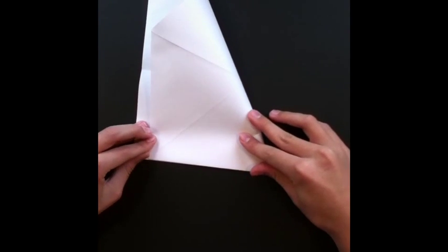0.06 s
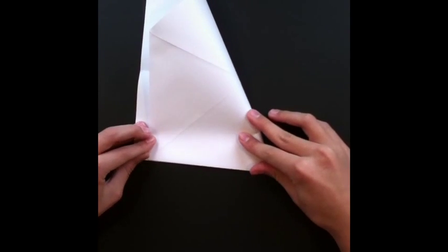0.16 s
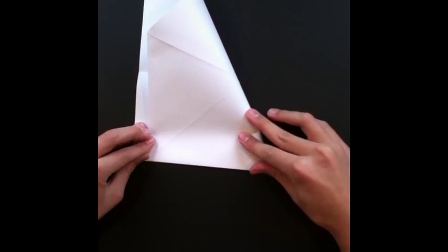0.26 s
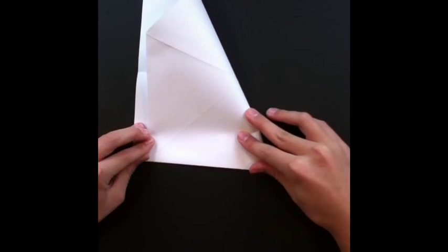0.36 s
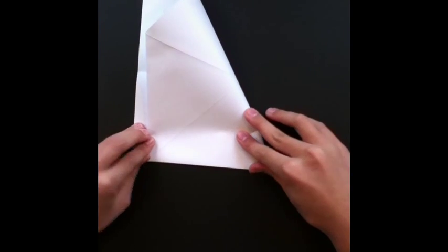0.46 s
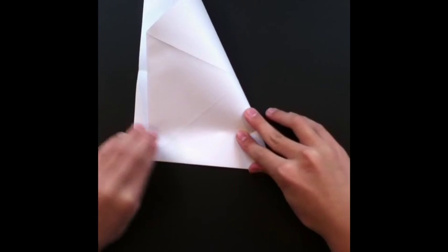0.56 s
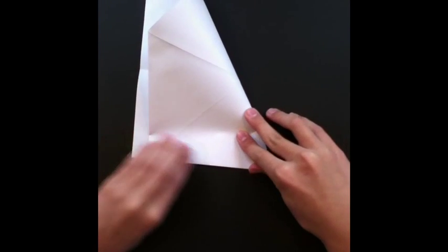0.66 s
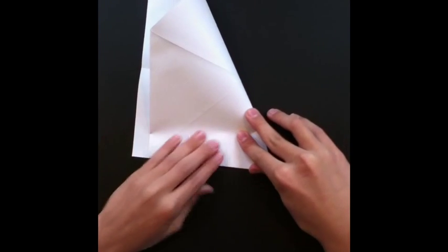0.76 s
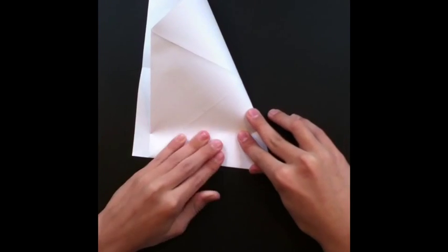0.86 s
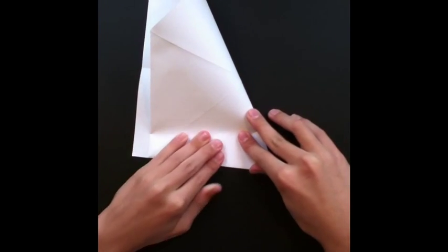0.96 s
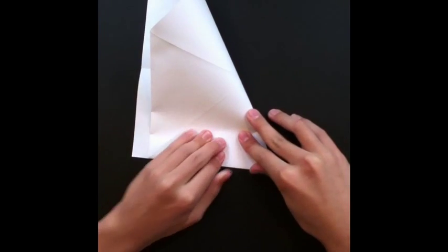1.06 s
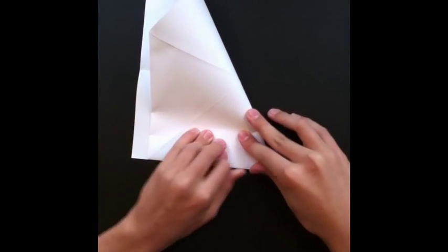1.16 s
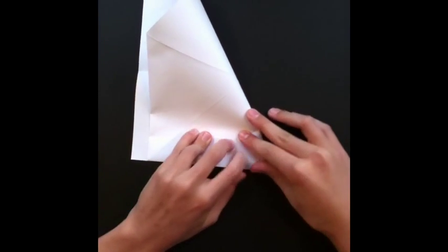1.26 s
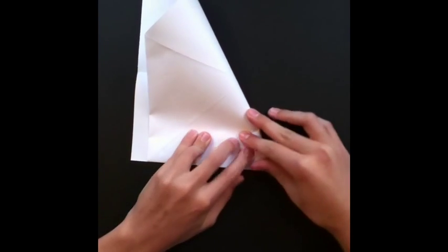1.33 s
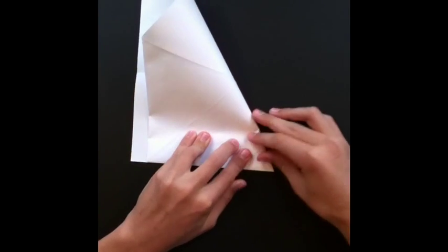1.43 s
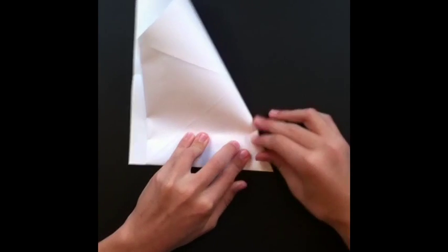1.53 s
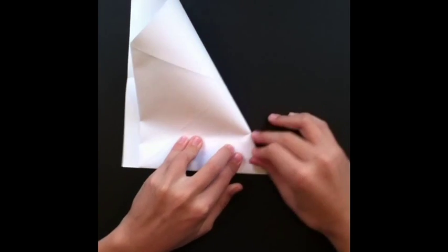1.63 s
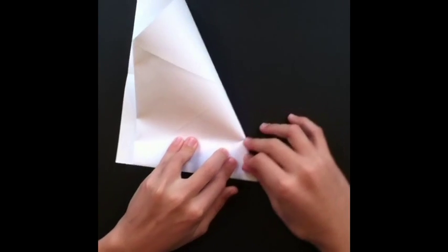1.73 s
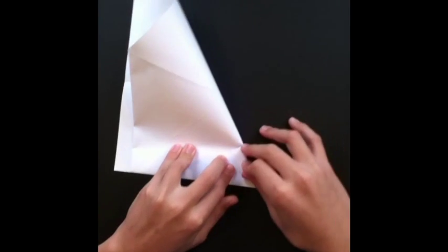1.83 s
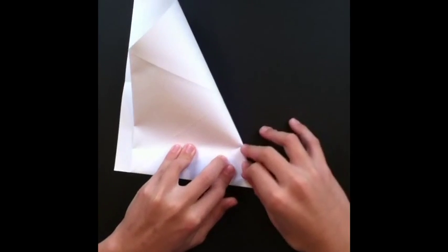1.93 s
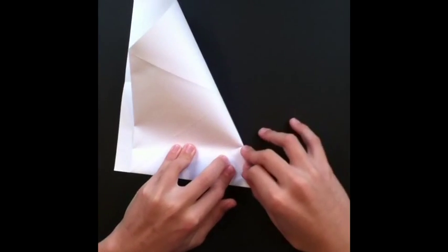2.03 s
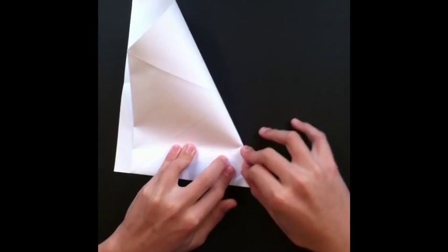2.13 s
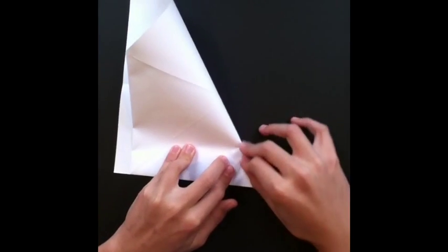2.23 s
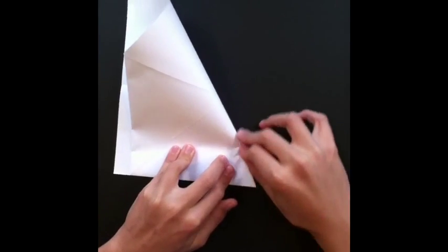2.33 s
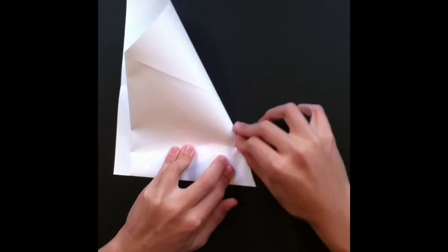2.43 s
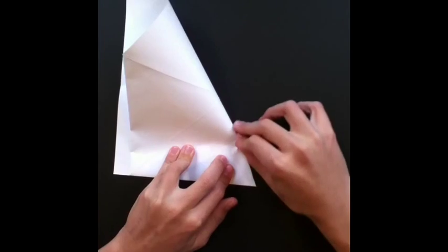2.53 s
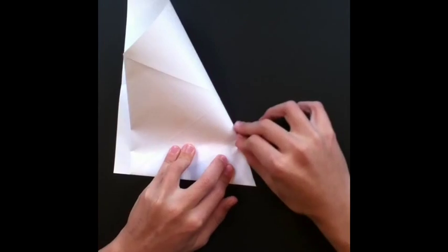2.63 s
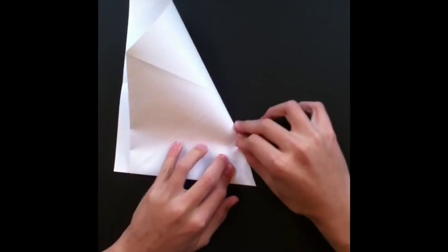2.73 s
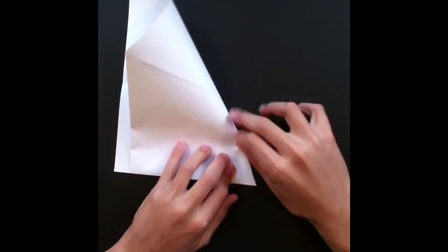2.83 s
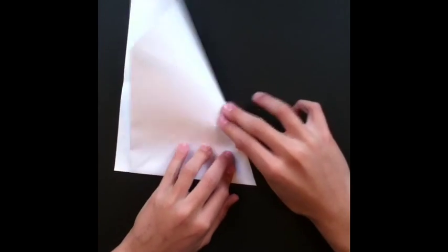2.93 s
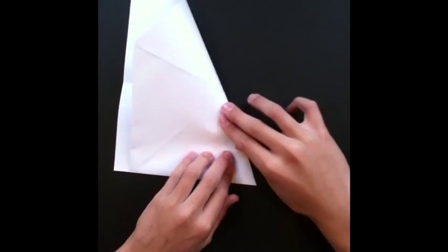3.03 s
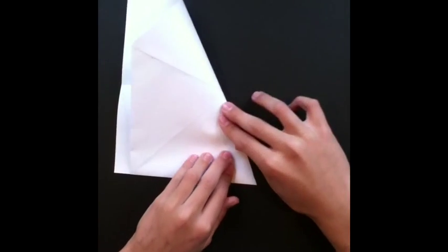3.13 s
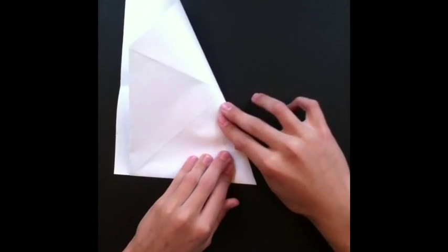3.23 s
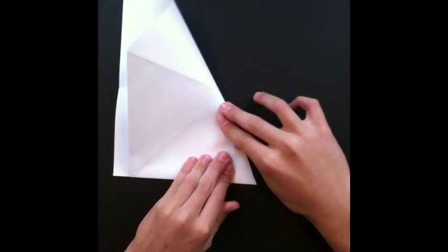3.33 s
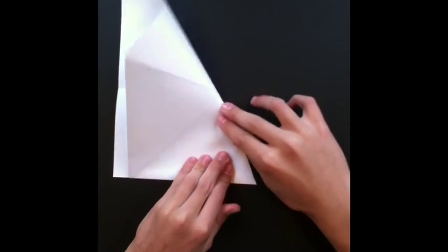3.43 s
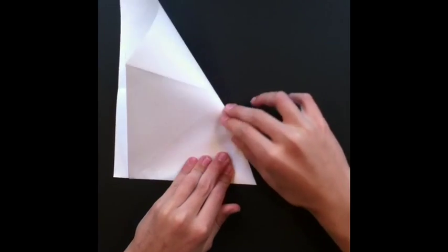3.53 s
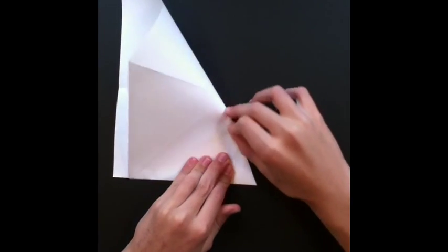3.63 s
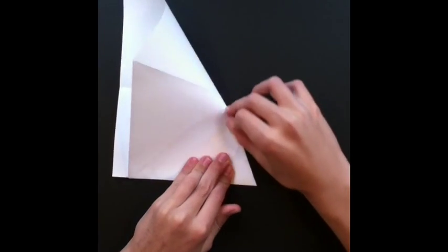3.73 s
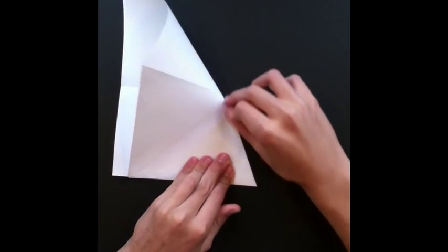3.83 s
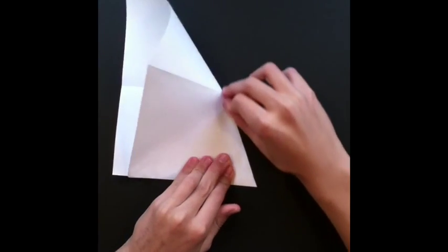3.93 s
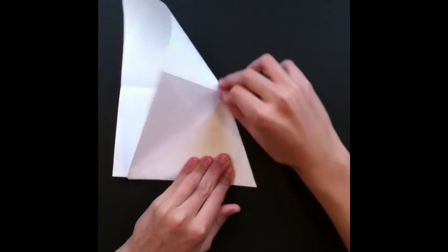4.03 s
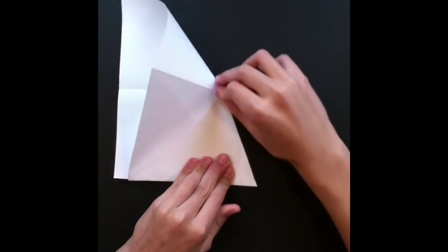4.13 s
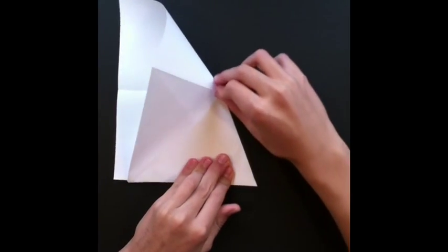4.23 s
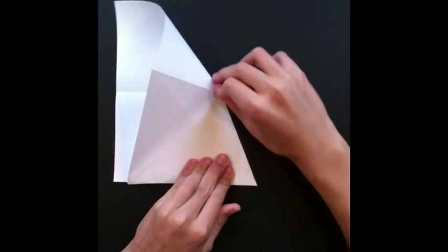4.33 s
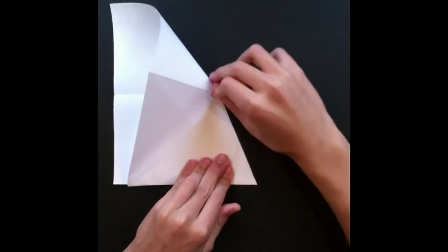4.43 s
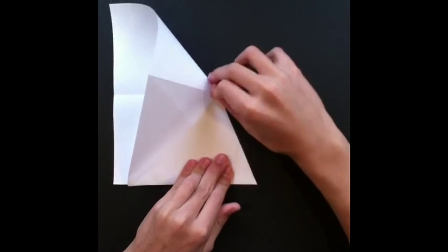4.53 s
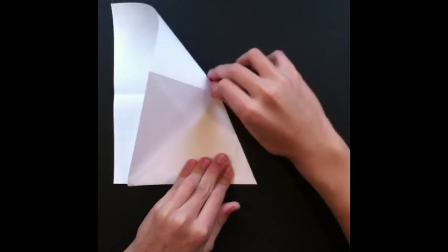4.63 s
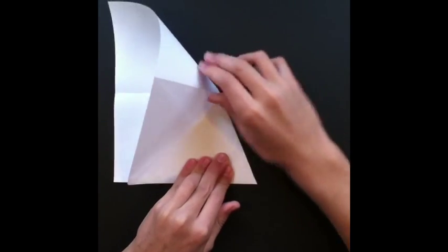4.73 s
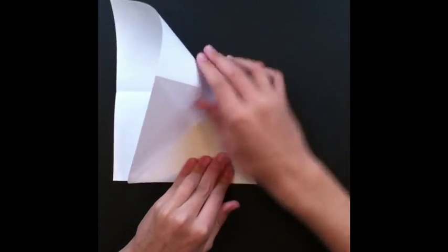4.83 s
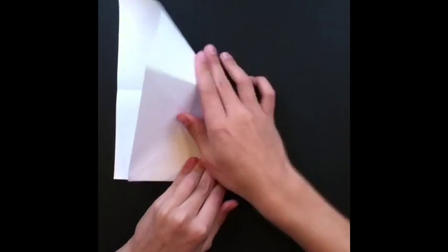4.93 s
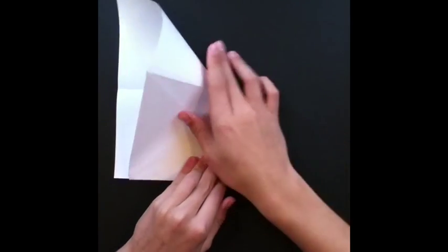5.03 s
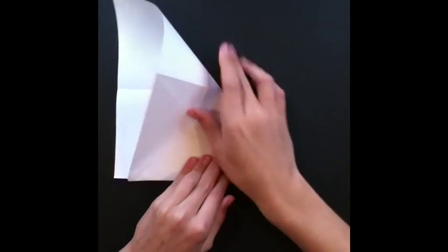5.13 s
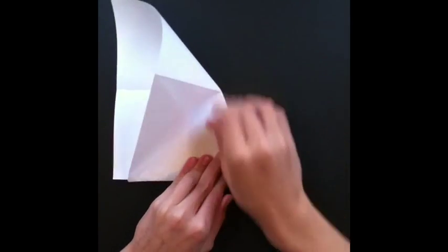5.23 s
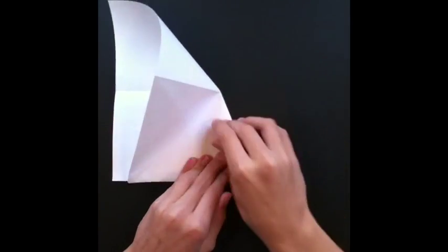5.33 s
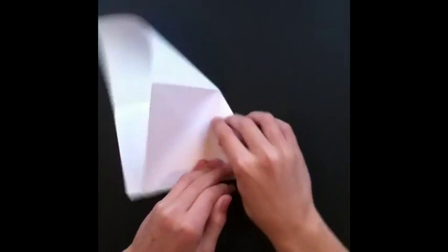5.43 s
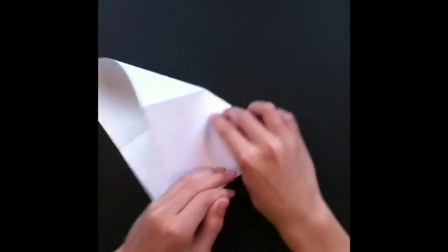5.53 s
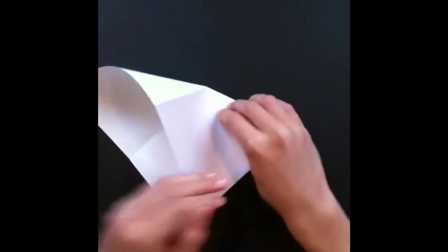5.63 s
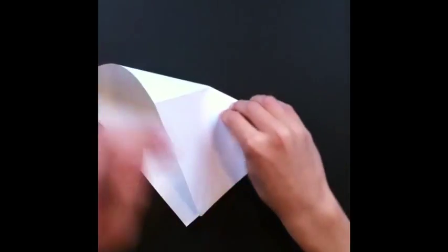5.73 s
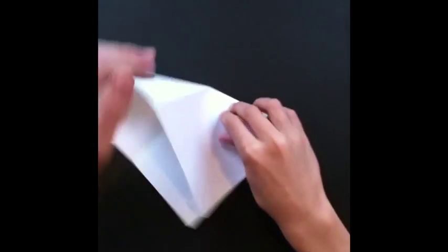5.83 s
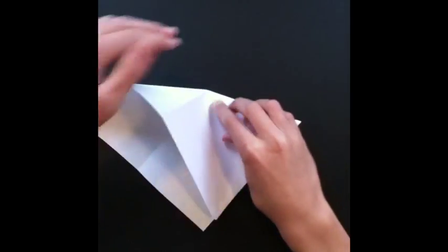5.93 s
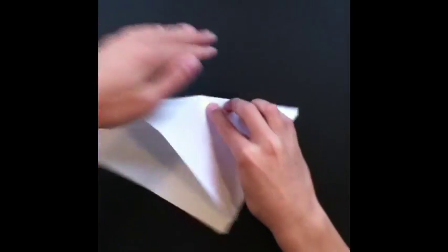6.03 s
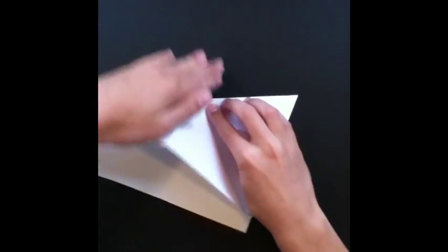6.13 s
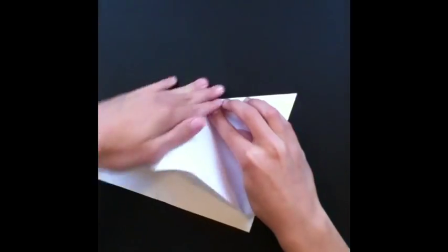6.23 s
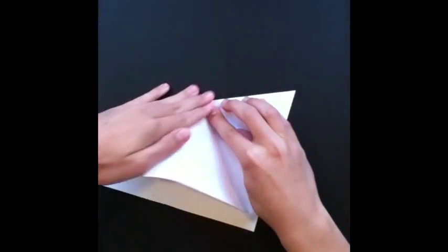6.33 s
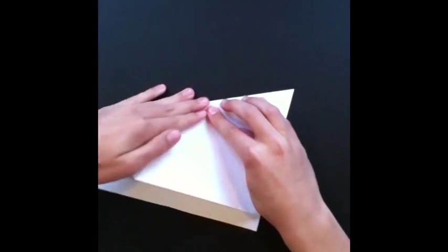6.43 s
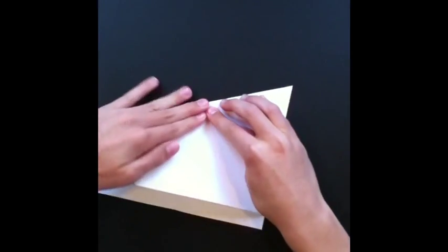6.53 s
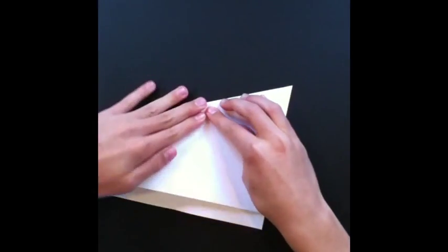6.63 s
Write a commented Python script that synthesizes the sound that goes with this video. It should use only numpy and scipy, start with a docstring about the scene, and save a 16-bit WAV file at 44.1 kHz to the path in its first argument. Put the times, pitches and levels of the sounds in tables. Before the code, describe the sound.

A stiff sheet of paper is folded on a table, heard closely in a small quiet room with soft steady air noise and a faint low hum. During the first 1.4 seconds there are only tiny ticks, light finger brushes and small crinkles around 0.6. A crisp snap at 1.47 leads into a hissing, grainy slide from 1.6 to about 2. Bright sharp pops come at 2.4 to 2.5 with a soft pat, then a short brush at 2.9. Another strong snap falls at 3.4, a lesser one at 3.7. Gentle rubbing, small crackles and a dull pat around 4.15 continue quietly until 5.4. From 5.45 the sheet is turned: a loud breathy swish peaks near 5.55, with more quick swishes at 5.9, 6.1 and 6.25. Soft thumps and dense crisp crackling fill 6.3 to the end, just after 6.5.

```python
"""Folding a sheet of paper

A sheet of paper is folded by hand on a table in a small room. Fingers brush and press it and its layers slide:
shaped noise full of tiny grains. The bent sheet buckles with sharp snaps: falling sweeps, crackle and ringing noise.
Now and then soft pats, flaps and rubs puff air, as swells of low noise, and set the table top ringing softly.
Faint ticks, a short room tail and steady room noise with a low drone lie around it all."""
import sys
import numpy as np
from scipy import signal
from scipy.fft import rfft, irfft, next_fast_len
from scipy.io import wavfile

SR = 44100
rng = np.random.default_rng(int(sys.argv[2]) if len(sys.argv) > 2 else 0)


def master_out(mix):
    """Clip the mix to full scale and print it as 16-bit PCM to the path in sys.argv[1]."""
    frames = np.transpose(np.atleast_2d(mix))
    ceiling = np.clip(frames, -1, 1)
    pcm = np.round(ceiling * 32767).astype(np.int16)
    wavfile.write(sys.argv[1], SR, pcm)


N = 293706   # length of the scene in samples


# long slides of paper: (start t/s, rise t/s, time until the hand lets up t/s, friction level/dB before the
# trim of all slides, change of friction until then level/dB, hollow part level/dB against friction,
# fine hiss level/dB against friction)
LONG_SLIDES = [(1.59, 0.0164, 0.356, -30.5, -7, -6.5, -2.5), (1.835, 0.0423, 0.0849, -32, -2, -10, -2.5),
               (2.202, 0.0111, 0.2236, -47, 3.5, -3.5, -0.5), (2.465, 0.0163, 0.061, -42.5, 4, 4.5, -6.5),
               (3.57, 0.0415, 0.315, -50, -2.5, 0.5, 3.5), (3.829, 0.0075, 0.1935, -40.5, -5.5, -4.5, 2),
               (4.0, 0.051, 0.2247, -43, 1, -2, -3), (4.37, 0.0965, 0.121, -46, 0, -3.5, -4),
               (5.08, .02, 0.364, -53, -5, -5, 2), (5.44, 0.0128, 0.1014, -30.5, 1, -13.5, 0),
               (5.53, 0.0397, 0.1574, -24, -6.5, -16.5, 1.5), (5.7, 0.029, .06, -38, 0.5, -6.5, -7.5),
               (5.91, .021, 0.0491, -27, -1, -19, -3.5), (6.066, 0.0192, 0.1294, -26.5, -6, -15, 0.5),
               (6.256, 0.0096, 0.034, -26, -6.5, -11.5, 4), (6.31, 0.021, 0.1437, -40, -6.5, -2, -2),
               (6.49, 0.0091, 0.1084, -40.5, -5, -5.5, -2.5)]


def slides(trim_db=-2.0, wobble_db=0.49, wobbles_per_s=30, release_db_per_s=451.5):
    """Paper drawn over paper and table takes hold, runs on unsteadily and dies away, darkening as it slows."""
    # for each dB of friction lost: dB of hiss lost and dB of hollow part gained
    hiss_follows, hollow_lags = 0.64, 0.4
    out = np.zeros(N)
    for start, rise, length, friction_db, change_db, hollow_db, hiss_db in LONG_SLIDES:
        t = seconds(length + 45 / release_db_per_s)
        speed_db = change_db * np.minimum(t / length, 1)
        speed_db = speed_db - release_db_per_s * np.maximum(t - length, 0)
        speed_db = speed_db + wobble_db * drift(t, wobbles_per_s)
        slide_hollow_db = hollow_db - hollow_lags * speed_db
        slide_hiss_db = hiss_db + hiss_follows * speed_db
        rub = friction(start, t, friction_db + speed_db, slide_hollow_db, slide_hiss_db)
        taking_hold = np.sin(np.pi / 2 * np.clip(t / rise, 0, 1)) ** 2
        add(out, start, taking_hold * rub)
    return from_db(trim_db) * out


# short finger brushes: (start t/s, length t/s, friction level/dB, fine hiss level/dB against friction)
FINGER_BRUSHES = [(0.589, 0.055, -58, 4), (0.869, 0.094, -62.5, 1.5), (0.944, 0.055, -46, -3),
                  (1.07, 0.062, -59.5, 4), (1.115, 0.143, -68.5, 11), (1.281, 0.0484, -49, 2),
                  (1.422, 0.075, -54.5, 7), (1.465, 0.0455, -45, 2.5), (1.517, 0.176, -62.5, 9),
                  (2.023, 0.0228, -52, -1.5), (2.76, 0.0276, -52.5, 5), (2.801, .055, -51.5, -5.5),
                  (2.859, 0.0475, -47.5, 1.5), (2.904, 0.0421, -35.5, 1.5), (3.021, 0.0215, -48, 3),
                  (3.044, 0.0786, -53.5, -3.5), (3.139, 0.0442, -44, 0), (3.499, 0.0783, -46, 1),
                  (3.686, .012, -38.5, 0.5), (3.83, 0.0114, -42, 3.5), (4.124, .024, -31.5, -4),
                  (4.724, 0.157, -51, -6.5), (4.761, 0.0495, -43.5, 4.5), (5.004, 0.0756, -49, 0),
                  (5.218, 0.0075, -38.5, 2), (5.229, 0.0252, -40, 2), (5.859, 0.0332, -40, -6.5)]
# how far the flap arches under the fingers: (t/s, hollow part of a light touch level/dB against friction)
FLAP_ARCH = [(0, -1), (1.3, 5), (2.0, -10), (3.1, -2), (4.8, -8.5), (5.9, -10)]


def brushes(light_touch_db=-57, flattening=0.19):
    """Fingertips shift their grip; a harder brush presses the arch flat, so it sounds less hollow."""
    out = np.zeros(N)
    for start, length, level_db, hiss_db in FINGER_BRUSHES:
        t = seconds(length + 0.059)
        arch_db = np.interp(start, *np.transpose(FLAP_ARCH))
        # flattening: dB of hollow part lost per dB above a light touch
        hollow_db = arch_db - flattening * (level_db - light_touch_db)
        add(out, start, swell(t, length) * friction(start, t, level_db, hollow_db, hiss_db))
    return out


# colour of sliding paper: (f/Hz, level/dB per Hz, relative)
PAPER_COLOUR = [(180, -45.5), (300, 17.5), (737, -3.5), (915, -3.5), (1280, -5.5), (1690, -6.5),
                (2070, -4.5), (2440, -4), (4160, -2), (6100, -4), (7200, -4.5), (10700, -12.5),
                (13500, -26.5), (16000, -39)]
# how the sheet is held: (t/s, resonance of the air pocket under the flap f/Hz,
# its sharp peak level/dB against the broad hollow, top of the hiss level/dB against the hiss)
SHEET_GRIP = [(0, 1227, 8.5, -11), (1.6, 1303, 4.5, -18.5), (2.25, 888, 1, -23.5), (2.9, 1253, -5.5, -25.5),
              (3.7, 1002, -6.5, -21), (4.8, 1070, -16, -14.5), (5.4, 1088, -12, -29.5),
              (6.6, 1100, -30, -17.5)]


def friction(start, t, level_db, hollow_db, hiss_db, pocket_width=1.865, peak_width=1.209):
    """The grains sound through the sheet: an arched sheet is hollow, a fast flat slide hisses."""
    rub = coloured(bounces(grains(t), t), PAPER_COLOUR)
    times, *columns = np.transpose(SHEET_GRIP)
    hz, peak_db, top_db = [np.interp(start, times, column) for column in columns]

    # the widths are frequency ratios either side of the pocket's resonance
    broad = zone(rub, hz / pocket_width, hz * pocket_width, order=2)
    peak = zone(rub, hz / peak_width, hz * peak_width, order=1)
    hollow = rms_one(broad + from_db(peak_db) * peak)
    middle = zone(rub, 1593, 5896)
    hiss = rms_one(zone(rub, 6118, .45 * SR) + from_db(top_db) * zone(rub, 13630, .45 * SR))
    return from_db(level_db) * (middle + from_db(hollow_db) * hollow + from_db(hiss_db) * hiss)


def grains(t, catches_per_s=3500, grain_db=3, smooth=1.0, snags_per_s=120, snag_db=-14, uneven_db=0.87):
    """Fibres catch and slip: sharp grains and a few larger snags on a smooth rub, under uneven pressure."""
    count = len(t)
    sizes = from_db(grain_db * np.minimum(rng.exponential(1, count), 5)) * rng.choice([-1, 1], count)
    catches = rms_one(sizes * (rng.random(count) < catches_per_s / SR))
    fine = catches + smooth * rng.standard_normal(count)
    snags = (rng.random(count) < snags_per_s / SR) * rng.uniform(-0.86, 1, count)
    snags = snags * np.sqrt(SR / snags_per_s)   # rarer snags are made stronger
    snags = signal.fftconvolve(snags, dying_noise(seconds(.01), 0.0058))[:count]
    pressure = from_db(uneven_db * drift(t, 167.8))
    return (fine + from_db(snag_db) * snags) * pressure


def bounces(x, t, share=0.262, glide=0.1288, count=3):
    """Close reflections off table, hand and flap ripple the colour; they shift as the hand moves."""
    shifts = np.array([drift(t, 6.02) for k in range(count)])
    lags = rng.uniform(0.000499, .004, (count, 1)) * (1 + glide * shifts)   # seconds
    return x + share * sum(np.interp(t - lag, t, x, left=0) for lag in lags)


# buckling of the sheet: (t/s, strength level/dB before the trim of all snaps, f/Hz, crackle length t/s)
SHEET_SNAPS = [(.185, -27, 1347, 0.00316), (.186, -31, 5160, 0.00171), (0.613, -24, 3990, 0.00109),
               (.648, -17.5, 3336, .0036), (1.403, -23.5, 3180, 0.00054), (1.407, -21, 1924, .002),
               (1.466, -12.5, 2994, 0.0018), (2.3878, -7, 2014, 0.00067), (2.3899, -6.5, 5480, 0.0013),
               (2.4588, 0, 3702, 0.001757), (2.71, -28, 949, 0.00266), (3.0, -15.5, 1943, 0.00071),
               (3.237, -19.5, 1450, 0.00264), (3.3505, -23.5, 1480, .002), (3.3798, .5, 2035, 0.00092),
               (3.6935, -7.5, 1250, .005), (4.135, -16.5, 3490, 0.00266), (4.173, -15.5, 3510, .0018),
               (4.264, -21, 3526, 0.0038), (4.363, -22.5, 4906, .0025), (4.977, -24.5, 1247, 0.00494),
               (5.042, -19.5, 1710, 0.0052), (5.393, -27, 1150, 0.00304), (6.293, -6.5, 3248, 0.0024),
               (6.305, -11, 2228, .0023), (6.35, -11, 3510, 0.0057), (6.411, -11, 2986, .0018),
               (6.4496, -13.5, 2670, 0.000894), (6.491, -18.5, 2610, 0.00235), (6.497, -12, 2550, 0.00296),
               (6.513, -13.5, 2957, .003)]


def snaps(spread=2.417, crackle=2.27, ring_pitch=0.779, ring_spread=1.724, edge_db=-14, edge_spread=3,
          top_hz=10500, trim_db=3, sheet_t60_s=0.0975):
    """A dent flips over: a bending pulse, a short crackle, then the sheet rings on a little lower."""
    # large, low dents set more of the sheet ringing
    dent_hz, dent_ring_db, ring_db_per_octave = 2170, -.5, -5.5
    out, t = np.zeros(N), seconds(.25)
    for start, strength_db, hz, length in SHEET_SNAPS:
        ring_db = dent_ring_db + ring_db_per_octave * np.log2(hz / dent_hz)
        # bending waves run faster at high pitch, so the pulse arrives as a tiny falling sweep
        sweep = signal.chirp(t, hz * 3, length, hz / 3, method="logarithmic", phi=90)
        pulse = energy_one(sweep * swell(t, length, skew=0.89))
        crackling = energy_one(rng.standard_normal(len(t)) * np.exp(-t / length))
        attack = energy_one(band(pulse + crackle * crackling, hz / spread, hz * spread))
        ring_hz = hz * ring_pitch
        ring = energy_one(band(dying_noise(t, sheet_t60_s), ring_hz / ring_spread, ring_hz * ring_spread))
        # the high modes are weak and die first
        edge = energy_one(band(dying_noise(t, sheet_t60_s / 2), hz, hz * edge_spread))
        snap = attack + from_db(ring_db) * ring + from_db(edge_db) * edge
        add(out, start, from_db(strength_db + trim_db) * snap)
    return band(out, 253, top_hz)


# soft low thuds: pats, flaps of the sheet, and long rows where the sliding hand rubs the table:
# (t/s, length t/s, level/dB, f/Hz)
SOFT_THUDS = [(1.079, 0.0503, -49.5, 201), (2.482, 0.091, -37.5, 840), (2.503, 0.0292, -36.5, 354),
              (2.53, 0.028, -49, 156.6), (3.383, 0.0456, -39.5, 450), (3.545, 0.21, -56.5, 225),
              (3.92, 0.192, -57.5, 222), (4.134, 0.0355, -42, 233.6), (4.139, 0.07, -47.5, 394),
              (4.18, 0.0515, -47, 232), (4.25, .15, -59, 227), (4.975, 0.0348, -52, 236.4),
              (5.385, 0.0466, -47.5, 134), (5.445, 0.251, -52, 265), (5.555, 0.212, -53, 122.4),
              (6.262, 0.0352, -40, 227), (6.284, 0.036, -30.5, 476), (6.384, 0.028, -41, 640),
              (6.386, 0.073, -47.5, 116), (6.408, 0.0158, -29.5, 479), (6.427, 0.0333, -42, 461),
              (6.513, 0.0184, -43, 411)]
# ringing modes of the table top: (f/Hz, level/dB, relative, time to fall 60 dB t/s)
TABLE_MODES = [(114.24, 3, 0.464), (215.57, 1, 0.46), (362.44, -3.5, 0.517), (445, -3.5, 0.387)]


def thuds(spread=1.362):
    """A pat, flap or rub puffs air, a swell of noise, and sets table modes near its pitch ringing."""
    # heavy, low thuds ring the table fully, higher ones less
    heavy_hz, table_ring_db, ring_db_per_octave = 220.3, 3, -11.5
    out, t = np.zeros(N), seconds(.55)
    table = sum(from_db(db - 60 * t / t60) * np.sin(2 * np.pi * hz * t) for hz, db, t60 in TABLE_MODES)
    for start, length, level_db, hz in SOFT_THUDS:
        ring_db = table_ring_db + ring_db_per_octave * max(np.log2(hz / heavy_hz), 0)
        air = band(rng.standard_normal(len(t)), hz / spread, hz * spread)
        puff = energy_one(air * swell(t, length))
        ring = energy_one(signal.fftconvolve(puff, table)[:len(t)])
        loudness = from_db(level_db) * np.sqrt(length * SR / 2)   # longer thuds carry more energy
        add(out, start, loudness * (puff + from_db(ring_db) * ring))
    return out


def creaks(per_s=9, level_db=-38, spread_db=4):
    """The held sheet ticks faintly all the time: bursts of dying noise at random moments."""
    strengths = from_db(level_db + spread_db * np.clip(rng.standard_normal(N), -2, 2))
    ticks = (rng.random(N) < per_s / SR) * strengths
    return band(signal.fftconvolve(ticks, dying_noise(seconds(.03), 0.026))[:N], 900, 9000, order=1)


def room(x, first_echo_s=0.00763, wall_hz=9000, t60_s=0.236, tail_db=-12):
    """The walls add a short diffuse tail, duller than the direct sound."""
    t = seconds(.5)
    tail = energy_one(band(dying_noise(t, t60_s) * (t > first_echo_s), 59, wall_hz, order=1))
    return x + from_db(tail_db) * signal.fftconvolve(x, tail)[:N]


# colour of the still room: (f/Hz, level/dB per Hz, relative)
AIR_COLOUR = [(15, -44), (25, -17), (66, -5.5), (249, -4.5), (293, -8), (405, -7), (451, -16), (489, -6.5),
              (531, -14.5), (887, -11.5), (2280, -19), (11900, -21.5), (14800, -25), (16000, -24.5)]


def still_air(drone_hz=210, drone_width_hz=14, drone_db=-69, top_hz=12500, air_db=-54):
    """Steady coloured noise fills the room, with a narrow band of noise as a faint low drone."""
    low, high = drone_hz - drone_width_hz / 2, drone_hz + drone_width_hz / 2
    drone = rms_one(band(rng.standard_normal(N), low, high, order=1))
    noise = band(coloured(rng.standard_normal(N), AIR_COLOUR), 15, top_hz, order=1)
    return from_db(air_db) * noise + from_db(drone_db) * drone


def from_db(db):
    """Turn dB into an amplitude factor."""
    return 10 ** (np.asarray(db) / 20)


def rms_one(x):
    """Scale a steady sound to rms 1."""
    return x / np.sqrt(np.mean(x ** 2) + 1e-20)


def energy_one(x):
    """Scale a short sound to a total energy of 1."""
    return x / np.sqrt(np.sum(x ** 2) + 1e-20)


def seconds(length):
    """Time axis of a sound, at least 16 samples long."""
    return np.arange(max(int(length * SR), 16)) / SR


def add(out, start, sound):
    """Mix a sound in at its time."""
    i = max(int(start * SR), 0)
    out[i:i + len(sound)] += sound[:max(N - i, 0)]


def band(x, low, high, order=2):
    """Keep the pitches between low and high (Hz)."""
    return signal.sosfilt(signal.butter(order, [low, high], "band", fs=SR, output="sos"), x + 1e-18)


def zone(x, low, high, order=3):
    """One register of a steady sound, filtered both ways to stay in phase with its neighbours; rms 1."""
    backward = band(x, low, high, order)[::-1]
    return rms_one(band(backward, low, high, order)[::-1])


def coloured(x, spectrum):
    """Filter a signal through a curve of (Hz, dB) points; rms 1."""
    hz, db = np.transpose(spectrum)
    size = next_fast_len(len(x))
    grid = np.maximum(np.arange(size // 2 + 1) * SR / size, 1)
    gain = from_db(np.interp(np.log(grid), np.log(hz), db))
    return rms_one(irfft(rfft(x, size) * gain, size)[:len(x)])


def drift(t, rate):
    """Random values, rate per second, joined by straight lines."""
    count = int(t[-1] * rate) + 2
    return np.interp(t * rate, np.arange(count), rng.standard_normal(count))


def dying_noise(t, t60):
    """Many close modes dying together, 60 dB in t60 seconds; energy 1."""
    return energy_one(rng.standard_normal(len(t)) * from_db(-60 * t / t60))


def swell(t, length, skew=0.627):
    """A touch grows quickly and lets go more slowly."""
    return np.abs(np.sin(np.pi * np.clip(t / length, 0, 1) ** skew))


def scene():
    """Paper and table sound in the room, over its still air; one channel."""
    paper_and_table = slides() + brushes() + snaps() + creaks() + thuds()
    return (room(paper_and_table) + still_air())[None]


def record(dry, cutoff_hz=15900):
    """The top is cut steeply."""
    return signal.sosfilt(signal.ellip(12, .1, 80, cutoff_hz, fs=SR, output="sos"), dry)


dry = scene()
out = record(dry)
master_out(out)
```